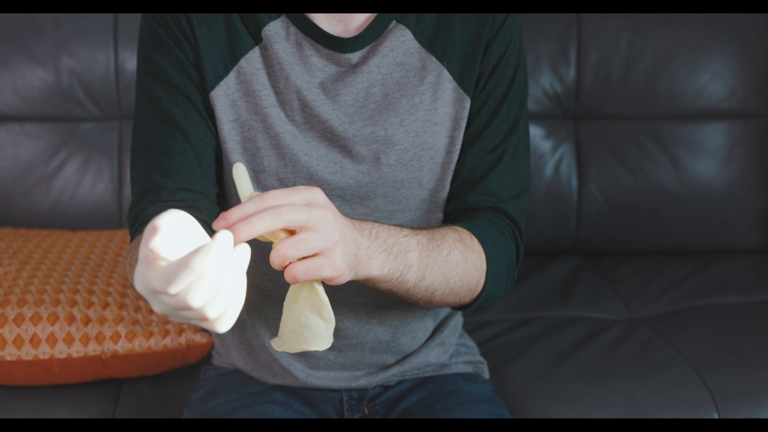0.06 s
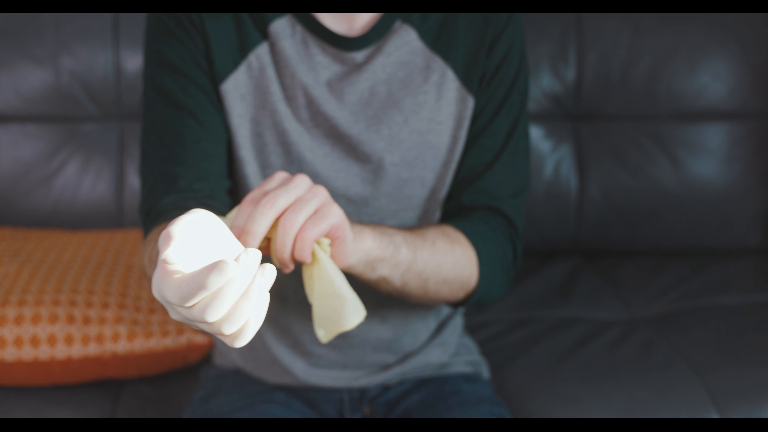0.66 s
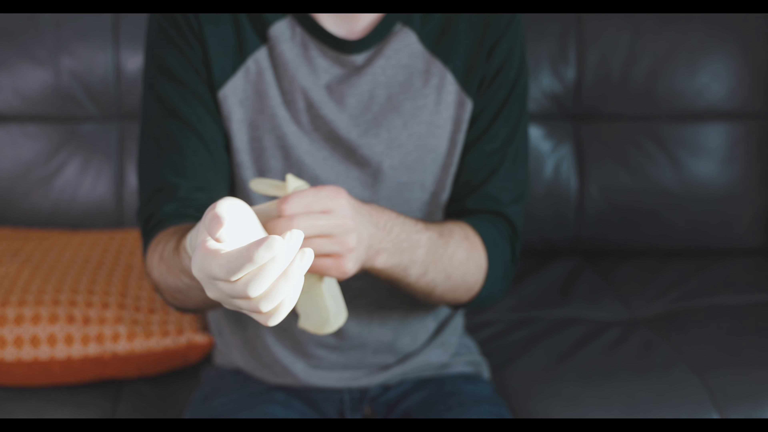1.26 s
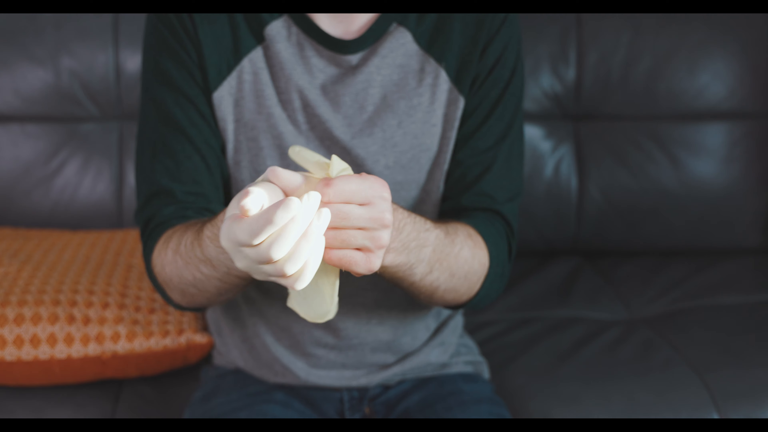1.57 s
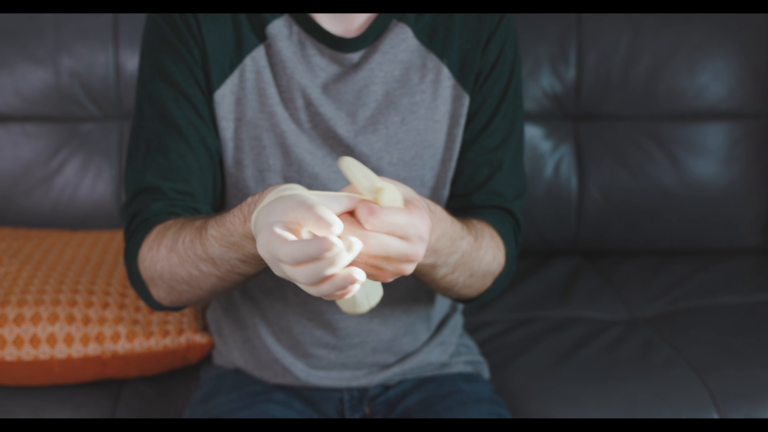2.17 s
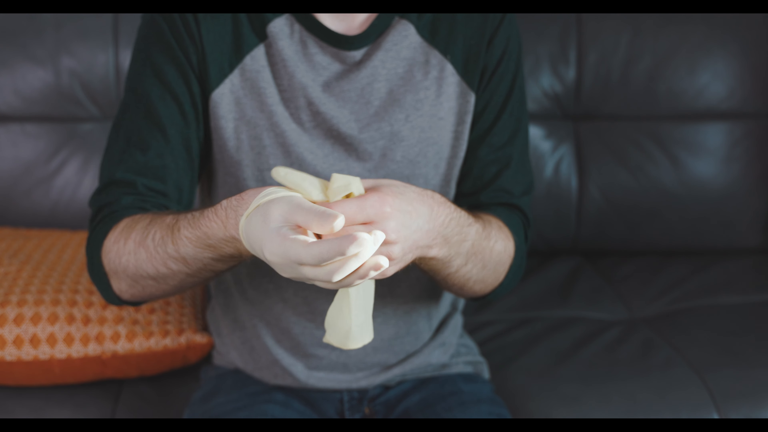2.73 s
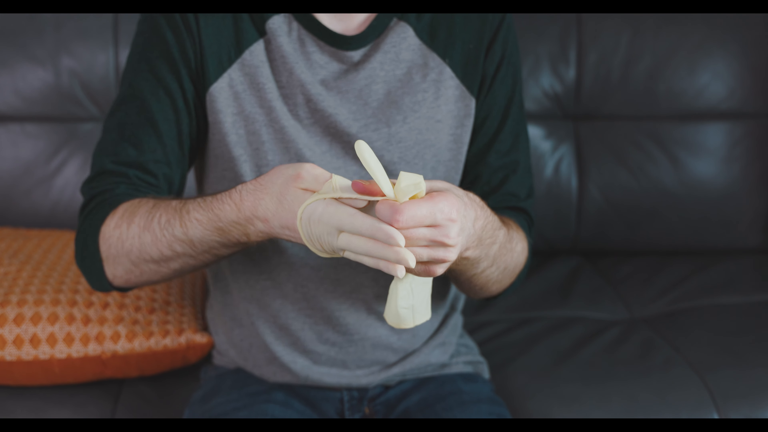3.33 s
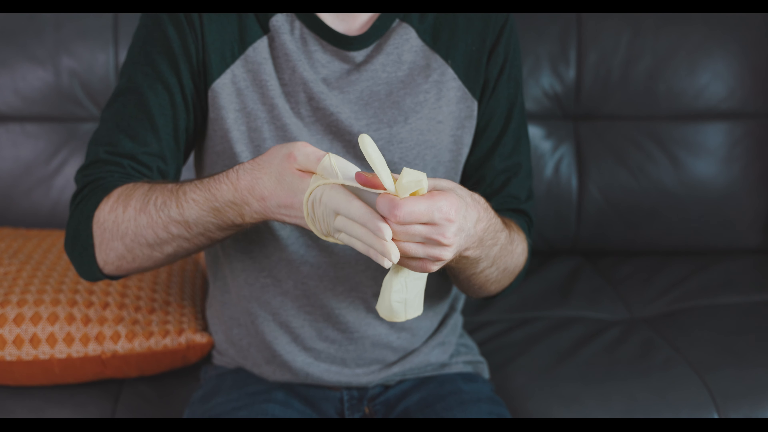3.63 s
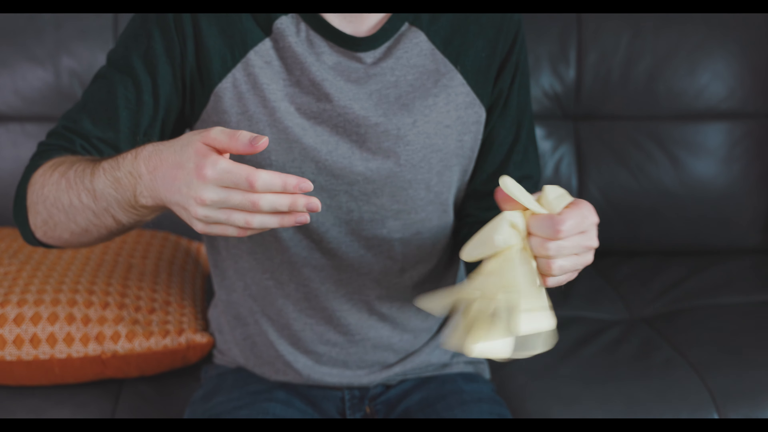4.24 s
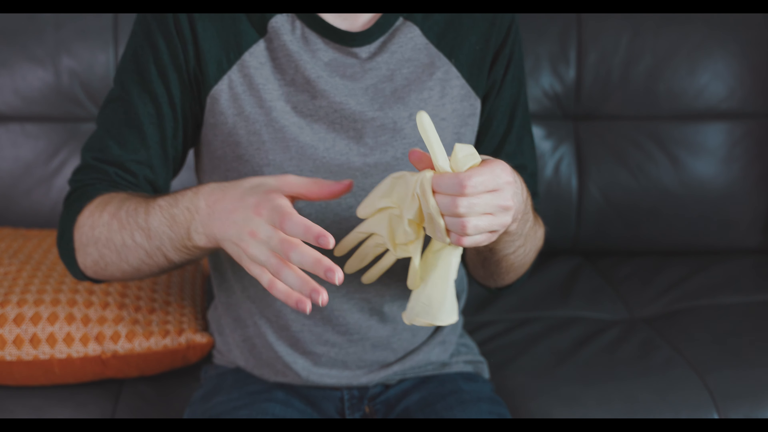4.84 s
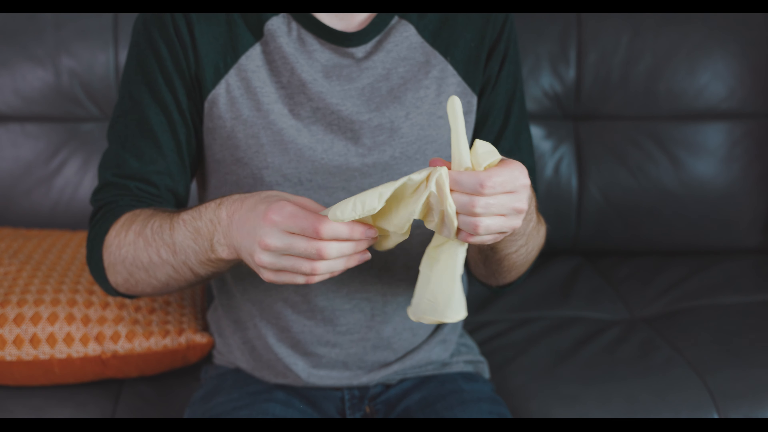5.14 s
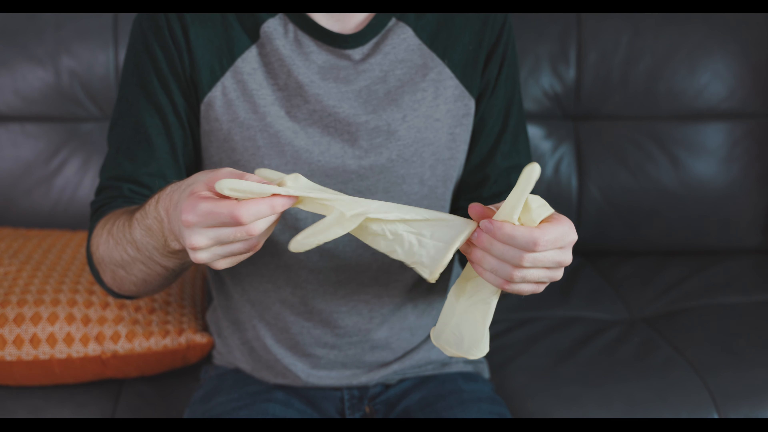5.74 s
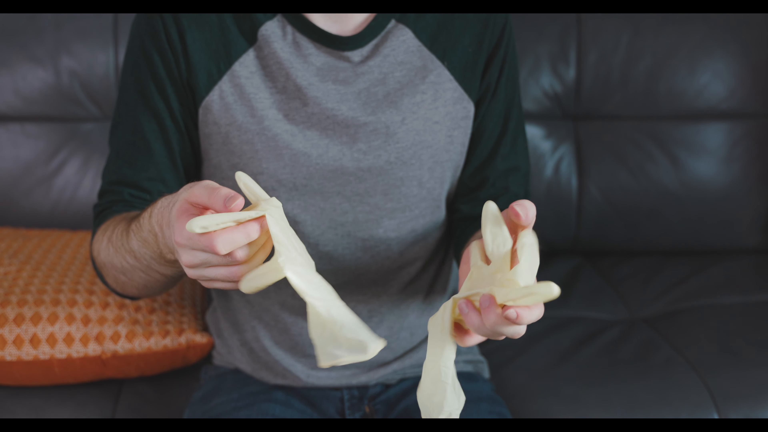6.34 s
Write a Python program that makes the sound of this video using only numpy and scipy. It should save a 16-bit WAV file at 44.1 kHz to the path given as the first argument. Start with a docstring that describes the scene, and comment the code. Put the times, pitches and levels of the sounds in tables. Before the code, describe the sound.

Close rubbery rustling and small pops of thin gloves, one loud snap as a glove pulls free, then light handling over faint room hum.

```python
"""Faint crinkles, rubs and ticks of latex, close up, over a low house rumble and hiss.
Someone on a sofa works a glove loose, pulls it off with a loud snap near 4 s and sorts the pair.
Folds flick, the glove drags and peels on skin, stretched rubber slaps back and pops small air pockets.
A small living room answers each snap; peaks at full scale clip the recorder."""
import sys
import numpy as np
from scipy import signal
from scipy.fft import rfft, irfft
from scipy.io import wavfile
from scipy.ndimage import uniform_filter1d

SR = 44100
rng = np.random.default_rng(int(sys.argv[2]) if len(sys.argv) > 2 else 0)


def store_wav(level_fs):
    """Save 16-bit WAV to argv[1]."""
    pcm = np.round(np.clip(np.atleast_2d(level_fs), -1, 1) * 32767)
    wavfile.write(sys.argv[1], SR, pcm.T.astype(np.int16))


N = 286650

# hands working the rubber: (time [s], effort [dB], peeling [dB])
HAND_WORK = [(0.0, -60, -80.5), (0.7, -61.5, -74), (1.38, -52.5, -67), (1.5, -45.5, -55),
             (1.78, -42.5, -59.5), (2.04, -54, -75.5), (2.57, -48.5, -61.5), (2.76, -54, -88),
             (2.92, -47, -63.5), (3.25, -58.5, -59), (3.75, -58, -70), (4.14, -37.5, -62),
             (4.28, -50, -69.5), (4.699, -62.5, -75), (5.12, -62, -76), (5.53, -46, -76),
             (5.85, -59.5, -73.5), (6.5, -60.5, -71.5)]
# folds flicking, tacky spots letting go: (time [s], slap [dB], sharpness = crack over slap [dB])
FOLD_TICKS = [(0.1378, -53.5, -7), (0.3857, -55, -27), (0.795, -52.5, -22), (0.9072, -63, 8),
              (0.9582, -45.5, 2.5), (1.0606, -45, -6), (1.1476, -51.5, -6), (1.222, -69, 15.5),
              (1.3029, -42.5, 0), (1.3381, -46, 1.5), (1.4761, -53, -5), (1.5483, -51.5, 9),
              (1.589, -40, -8.5), (1.8273, -44, -2), (1.8652, -48, 1), (2.0999, -37.5, -10),
              (2.169, -32.5, -15), (2.2641, -38, -4), (2.52, -63, 12), (2.8441, -52.5, 0),
              (2.931, -48, 4.5), (2.9418, -44, 6), (2.9526, -42, -1), (2.9659, -45, 8.5), (3.0523, -60, 9),
              (3.0629, -53, 6), (3.0828, -48.5, 8.5), (3.1073, -49, 4), (3.1442, -38, 3.5),
              (3.2472, -41.5, -2), (3.3189, -46, 5), (3.3746, -56.5, 10.5), (3.401, -46, -8),
              (3.4217, -50.5, 0), (3.4391, -56, 4.5), (3.4859, -45.5, -9), (3.5247, -48, -5.5),
              (3.6598, -53, 6.5), (3.6878, -58, 12.5), (3.7715, -50.5, 10), (3.8728, -63, 12),
              (3.8996, -57.5, 16.5), (3.9161, -44.5, -2), (3.94, -51, 5), (3.9591, -37, 5),
              (3.976, -32.5, -5), (4.3907, -45, -5), (4.4569, -35, -12.5), (4.6706, -54, 2),
              (4.812, -56.5, -15), (4.866, -53.5, -9), (5.017, -46.5, 1), (5.151, -47.5, -12),
              (5.2438, -41, -20), (5.2807, -45, -4), (5.3885, -41, -12), (5.4306, -51, 1.5),
              (5.522, -40, -16), (5.6334, -47.5, -13), (5.6565, -57.5, 8.5), (5.7303, -45, -6),
              (5.8713, -49, -9), (6.113, -47.5, -16), (6.2726, -50, -7), (6.4887, -49, -12.5)]
# rubber slapping back over an air pocket:
# (time [s], slap [dB], sharpness [dB], slap decay [ms], sheet [Hz], pocket [Hz], pocket [dB])
GLOVE_SNAPS = [(1.353, -27, -4, 2.6, 1010, 496, -21), (1.3737, -35, -9, 2.6, 1240, 480, -29),
               (1.5328, -39.5, -12, 1.9, 1100, 520, -40), (1.6226, -29, -3, 1.5, 2650, 390, -24.5),
               (1.656, -38, -21, 1.1, 1080, 340, -48), (1.8046, -37.5, -11.5, 6.8, 1000, 506, -36.5),
               (1.8511, -36, -4.5, 3, 974, 640, -41.5), (1.892, -40, -4.5, 5.5, 1520, 420, -46),
               (2.1093, -37, -8.5, 3.1, 1060, 600, -43), (2.1279, -39, -6.5, 2, 1710, 473, -40.5),
               (2.1819, -19, -17, 2.3, 1780, 475, -24.5), (2.1904, -9.5, -7.5, 2.4, 2405, 486, -15.5),
               (2.2288, -44, -15, 3, 2140, 538, -32), (2.357, -32.5, -13, 4, 1110, 500, -39.5),
               (2.402, -16.5, -6.5, 3.5, 1080, 593, -30), (2.417, -25, -2, 1.6, 2110, 565, -32),
               (2.4328, -18.5, -16, 2, 1110, 523, -21.5), (2.5376, -28, -10, 5.9, 2620, 474, -36.5),
               (2.5463, -31, -1.5, 6.5, 2620, 473, -35.5), (2.6842, -29.5, -2.5, 10, 1180, 482, -29),
               (2.8902, -27, -8, 2, 1200, 368, -36.5), (3.0675, -33.5, -21, 5.7, 1110, 500, -36),
               (3.0937, -44.5, 3, 9, 1030, 552, -31), (3.258, -34, -1, 5.7, 2100, 510, -27.5),
               (3.2703, -38, -18, 3, 1820, 294, -31), (3.33, -34.5, 1, 2.1, 1300, 585, -30.5),
               (3.9904, -23, -3.5, 3, 1209, 520, -16), (4.005, -26, -7, 5, 1148, 720, -20),
               (4.029, -33.5, -3, 4, 1447, 620, -23.5), (4.0367, -7.5, 1.5, 3.5, 1180, 520, -9.5),
               (4.0397, -20, 0.5, 4, 1288, 219, -20.5), (4.0496, -14.5, 2, 4, 2500, 334, -16),
               (4.0558, -12.5, -3.5, 3.5, 2805, 710, -16), (4.0606, -13, 0, 5, 2820, 511, -32.5),
               (4.0654, -14, -7, 3, 1120, 574, -23), (4.0828, -18, -7, 3.5, 2690, 462, -32),
               (4.0972, -23.5, 2, 2.5, 2546, 613, -22), (4.1017, -10, -13.5, 2.5, 2620, 633, -22),
               (4.1102, -11, -6.5, 4, 1879, 646, -32), (4.153, -18.5, -23, 11, 1580, 436, -35.5),
               (4.2176, -28, -18, 4.2, 1600, 694, -37), (5.3814, -43.5, -2, 5, 2070, 774, -41),
               (5.504, -41.5, -2.5, 2, 1230, 540, -41)]
# handling spectra: (frequency [Hz], gain [dB])
CRINKLE_EQ = [(300, -25), (700, 2.5), (1200, 2), (2200, 0), (3800, -4), (5500, -13), (8000, -24.5),
              (15500, -37)]
RUB_EQ = [(100, -10), (220, 1.5), (400, 1.5), (600, 1), (900, -23), (1600, -26.5), (4000, -40.5)]
# latex sheet spectra, dull to bright: (frequency [Hz], gain [dB])
THUD_EQ = [(70, -20), (130, -5), (210, -4.5), (330, 1.5), (620, 5), (800, -8), (1200, -16), (3000, -36.5)]
SLAP_EQ = [(300, -30.5), (750, -7), (1100, 0.5), (1450, -2.5), (1800, -1.5), (2400, -1.5), (2900, -4.5),
           (4000, -15.5), (8000, -46)]
CRACK_EQ = [(1000, -39), (2300, -1), (3100, 3.5), (4300, 3), (5500, -3), (7000, -29.5), (12000, -26)]
FIZZ_EQ = [(3000, -41), (6500, 11), (8500, 2), (11000, 1), (15500, -13.5)]
# house rumble and hiss: (frequency [Hz], relative density [dB])
HOUSE_EQ = [(12, -18), (20, 7), (53, 0), (245, -9.5), (333, -14), (581, -16), (811, -21), (1100, -22),
            (1270, -31), (1500, -17.5), (1870, -36), (3260, -27), (5090, -31), (15500, -35.5)]
# room reflections: (frequency [Hz], gain [dB])
ROOM_EQ = [(100, -11), (220, -1), (520, -5), (850, -3.5), (1150, -1.5), (1500, 0.5), (2250, 1.5),
           (2900, 0.5), (4500, -3.5), (8000, -1), (15000, -4.5)]
# room decay: (frequency [Hz], T60 [s])
ROOM_DECAY = [(200, 0.39), (530, 0.28), (1400, 0.25), (2300, 0.24), (4000, .26), (10000, 0.18)]


def amp(db):
    return 10 ** (np.asarray(db) / 20)


def unit_rms(x):
    return x / np.sqrt(np.mean(x ** 2))


def hit_level(x, db, hold_s=.007):
    """Scale to the energy of db rms held for hold_s."""
    return x * amp(db) * np.sqrt(hold_s * SR / np.sum(x ** 2))


def log_interp(points, hz):
    """Read (Hz, value) points on a log-frequency axis."""
    point_hz, value = np.transpose(points)
    return np.interp(np.log(np.maximum(hz, 1)), np.log(point_hz), value)


def response(eq, size=1024):
    """Minimum-phase impulse response of a spectrum."""
    hz = np.arange(size // 2 + 1) * SR / size
    cepstrum = irfft(np.log(amp(log_interp(eq, hz))))
    cepstrum[1:size // 2] *= 2
    cepstrum[size // 2 + 1:] = 0
    return irfft(np.exp(rfft(cepstrum)))[:size // 2]


def wander(rate_hz):
    """Smooth random drift, rms 1."""
    hold = int(SR / rate_hz)
    steps = np.repeat(rng.standard_normal(N // hold + 1), hold)[:N]
    return unit_rms(uniform_filter1d(uniform_filter1d(steps, hold), hold))


def hands(time_s):
    """Effort and peeling [dB] at time_s."""
    times_s, *columns = np.transpose(HAND_WORK)
    return [np.interp(time_s, times_s, column) for column in columns]


def slips(eq, per_s, spread_db):
    """Tiny random slips of rubber, mostly weak, a few strong; rms 1."""
    happens = rng.random(N) < per_s / SR
    sizes = amp(spread_db * np.minimum(rng.exponential(size=N), 4))
    impulses = happens * sizes * rng.standard_normal(N)
    return unit_rms(signal.fftconvolve(impulses, response(eq))[:N])


def rustle(light_effort_db=-60, rub_db_per_db=.75):
    """Loose latex crinkles in the fingers; the worn glove peels off the skin and drags over it."""
    effort_db, peel_db = hands(np.arange(N) / SR)
    rub_db = -65 + rub_db_per_db * (effort_db - light_effort_db)
    crinkle = amp(effort_db - 3.5) * slips(CRINKLE_EQ, per_s=1900, spread_db=2.5)
    peel = amp(peel_db - 5) * slips(FIZZ_EQ, per_s=730, spread_db=2)
    rub = amp(rub_db) * slips(RUB_EQ, per_s=1800, spread_db=1.5)
    grip_db = 2.3 * wander(rate_hz=130)  # grip catches and slides
    return amp(grip_db) * (crinkle + peel + rub)


def house_air(level_db=-54, drift_db=.5):
    """Faint house rumble under an even hiss."""
    hz = np.arange(N // 2 + 1) * SR / N
    noise = irfft(rfft(rng.standard_normal(N)) * amp(log_interp(HOUSE_EQ, hz)), N)
    return amp(level_db) * unit_rms(noise) * amp(drift_db * wander(rate_hz=3.6))


def fold_flicks(strays_per_s=6, stray_spread_db=3, base_hz=2200, oct_per_db=.025, spread_oct=.36):
    """Listed and stray flicks, sharper ones higher: (time [s], slap [dB], sharpness [dB], sheet [Hz])."""
    times_s = rng.uniform(0, N / SR, int(strays_per_s * N / SR))
    slap_jitter_db, sharp_jitter_db = stray_spread_db * rng.standard_normal((len(times_s), 2)).T
    effort_db, _ = hands(times_s)
    strays = np.column_stack([times_s, effort_db - 2.5 + slap_jitter_db, sharp_jitter_db - 6])
    flicks = np.vstack([FOLD_TICKS, strays])
    octaves = oct_per_db * flicks[:, 2] + spread_oct * rng.standard_normal(len(flicks))
    return np.column_stack([flicks, base_hz * 2 ** octaves])


def contact(body, db, decay_ms, first_blow, scatter, rise_ms=.29, size=2048):
    """Rubber lands with one blow; the rest of the sheet follows as a fading spray of tiny contacts."""
    ms = 1000 * np.arange(size) / SR
    spray = rng.standard_normal(size) * amp(5 * rng.standard_normal(size))
    spray *= np.exp(-ms / max(decay_ms, .1)) * (1 - np.exp(-ms / rise_ms))
    spray *= scatter / np.sqrt(np.sum(spray ** 2))
    spray[0] = first_blow
    return hit_level(signal.fftconvolve(spray, body), db)


def taut_sheet(slap, hz, ring_db):
    """The struck stretch of sheet rings a few cycles at its own pitch."""
    return slap + amp(ring_db) * signal.lfilter(*signal.iirpeak(hz, Q=4, fs=SR), slap)


def treble_db(time_s, slap_db, sharpness_db, loose_peel_db=-70):
    """Crack and fizz levels: sharp contact raises both; rubber clinging to skin fizzes more."""
    crack_db = slap_db + sharpness_db
    cling_db = hands(time_s)[1] - loose_peel_db
    fizz_db = crack_db - 13 + .35 * sharpness_db + .5 * cling_db
    return crack_db, fizz_db


def ticks(flicks, thud, slap, crack, fizz, scatter, ring_db):
    """Small dry flicks of the sheet, no air behind them."""
    out = np.zeros(N)
    for time_s, slap_db, sharpness_db, sheet_hz in flicks:
        crack_db, fizz_db = treble_db(time_s, slap_db, sharpness_db)
        ringing = taut_sheet(slap, sheet_hz, ring_db)
        add(out, time_s, contact(thud, slap_db - 8.5, decay_ms=2.7, first_blow=.37, scatter=scatter))
        add(out, time_s, contact(ringing, slap_db, decay_ms=6.3, first_blow=.42, scatter=scatter))
        add(out, time_s, contact(crack, crack_db, decay_ms=1.2, first_blow=.9, scatter=scatter))
        add(out, time_s, contact(fizz, fizz_db, decay_ms=.66, first_blow=1.1, scatter=scatter))
    return out


def add(track, time_s, sound):
    start = max(int(time_s * SR), 0)
    part = sound[:max(N - start, 0)]
    track[start:start + len(part)] += part


def pocket_decay_ms(hz, over_slap_db, base_cycles=2.6, doubling_db=14.5, max_cycles=5.3):
    """A pocket strong against its slap is well sealed and rings longer."""
    cycles = min(base_cycles * 2 ** (over_slap_db / doubling_db), max_cycles)
    return 1000 * cycles / hz


def pocket_pop(hz, db, decay_ms, sag=.15, rise_ms=.94, size=3072):
    """Trapped air rings, pitch sagging, until the rubber closes on it."""
    ms = 1000 * np.arange(size) / SR
    pitch_hz = hz * (1 + sag * (np.exp(-ms / decay_ms) - .5))
    ring = np.sin(2 * np.pi * np.cumsum(pitch_hz) / SR)
    closing = np.exp(-(ms / decay_ms) ** 1.2)
    return hit_level(ring * (1 - np.exp(-ms / rise_ms)) * closing, db)


def snaps(thud, slap, crack, fizz, scatter, pop_gain_db, ring_db):
    """Stretched latex lets go: an air pocket pops and thuds under the slap; treble dies first."""
    out = np.zeros(N)
    for time_s, slap_db, sharpness_db, slap_ms, sheet_hz, pocket_hz, pocket_db in GLOVE_SNAPS:
        crack_db, fizz_db = treble_db(time_s, slap_db, sharpness_db)
        pocket_ms = pocket_decay_ms(pocket_hz, pocket_db - slap_db)
        ringing = taut_sheet(slap, sheet_hz, ring_db)
        add(out, time_s, pocket_pop(pocket_hz, pocket_db + pop_gain_db, pocket_ms))
        add(out, time_s, contact(thud, pocket_db - 9, pocket_ms, first_blow=.2, scatter=scatter))
        add(out, time_s, contact(ringing, slap_db, slap_ms, first_blow=.41, scatter=scatter))
        add(out, time_s, contact(crack, crack_db, .55 * slap_ms, first_blow=.65, scatter=scatter))
        add(out, time_s, contact(fizz, fizz_db, .17 * slap_ms, first_blow=.83, scatter=scatter))
    return out


def near_echo(x, gain_db=-10, delay_ms=1.6, decay_ms=5, top_hz=5000, size=2048):
    """Hands, chest and sofa scatter back a dull echo within milliseconds."""
    ms = 1000 * np.arange(size) / SR
    echo = rng.standard_normal(size) * (ms > delay_ms) * np.exp(-ms / decay_ms)
    echo /= np.sqrt(np.sum(echo ** 2))
    echo = signal.sosfilt(signal.butter(2, top_hz, fs=SR, output="sos"), echo)
    return amp(gain_db) * signal.fftconvolve(x, echo)[:N]


def room(x, gain_db=-7.5, gap_s=.0048, build_s=.0039, size=22050):
    """Reflections build after a short gap and die away, treble first."""
    time_s = np.arange(size) / SR
    hz = np.arange(size // 2 + 1) * SR / size
    spectrum = rfft(rng.standard_normal(size))
    tail = np.zeros(size)
    for centre_hz, t60_s in ROOM_DECAY:
        band = log_interp([(f, float(f == centre_hz)) for f, _ in ROOM_DECAY], hz)
        tail += irfft(spectrum * band, size) * np.exp(-np.log(1000) * time_s / t60_s)
    tail *= np.clip((time_s - gap_s) / build_s, 0, 1)
    tail = signal.fftconvolve(tail / np.sqrt(np.sum(tail ** 2)), response(ROOM_EQ))
    return amp(gain_db) * signal.fftconvolve(x, tail)[:N]


def radiate(x, edge_hz=170):
    """A hand-sized source radiates little bass."""
    return signal.sosfilt(signal.butter(2, edge_hz, "high", fs=SR, output="sos"), x)


def scene():
    """Gloves, reflections and house air at one microphone."""
    sheet = [response(eq) for eq in (THUD_EQ, SLAP_EQ, CRACK_EQ, FIZZ_EQ)]
    handling, flicks = rustle(), fold_flicks()
    direct = handling + snaps(*sheet, scatter=1, pop_gain_db=-.5, ring_db=6)
    direct += ticks(flicks, *sheet, scatter=.68, ring_db=-.5)
    # walls gather sound from all sides of the glove, evening out its colour
    all_round = handling + snaps(*sheet, scatter=.54, pop_gain_db=0, ring_db=-2)
    all_round += ticks(flicks, *sheet, scatter=.1, ring_db=-1)
    gloves = radiate(direct + near_echo(all_round) + room(all_round))
    return (gloves + house_air())[None]


def record(dry, top_hz=15750):
    """Clip at full scale, then low-pass steeply."""
    lowpass = signal.ellip(8, .05, 60, top_hz, fs=SR, output="sos")
    return signal.sosfiltfilt(lowpass, np.clip(dry, -1, 1))


dry = scene()
out = record(dry)
store_wav(out)
```